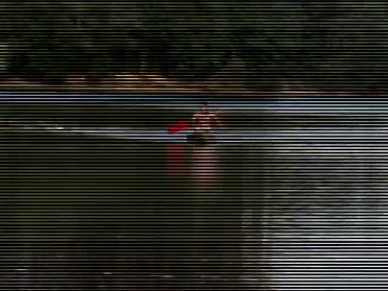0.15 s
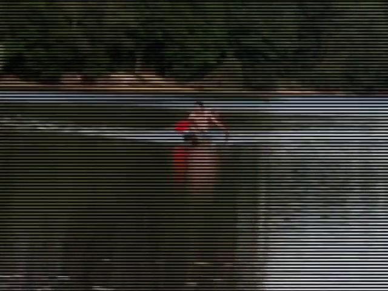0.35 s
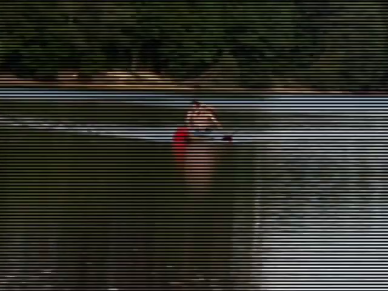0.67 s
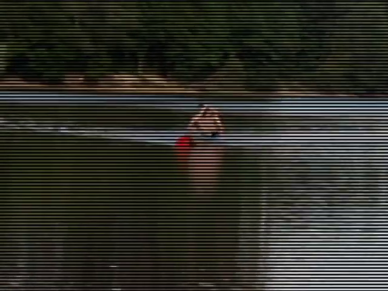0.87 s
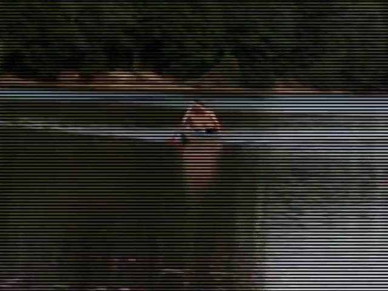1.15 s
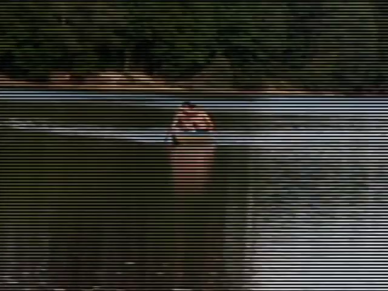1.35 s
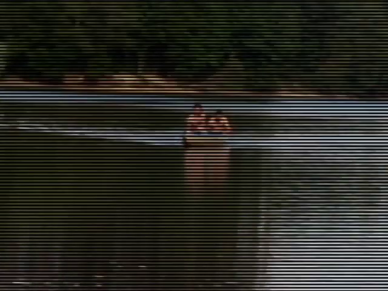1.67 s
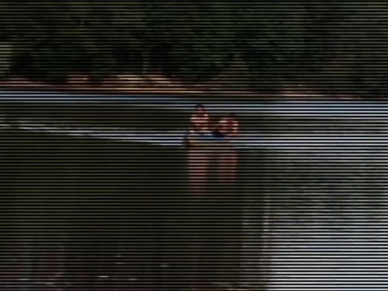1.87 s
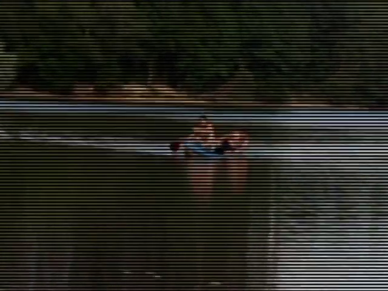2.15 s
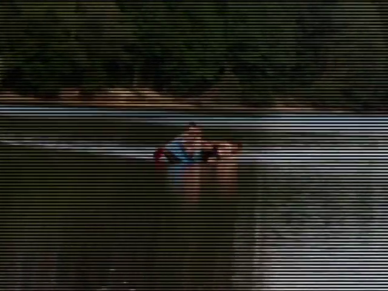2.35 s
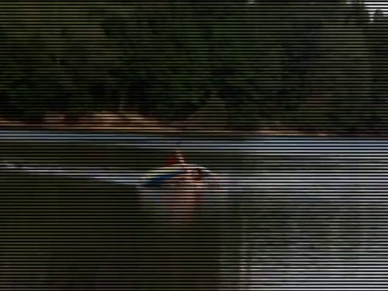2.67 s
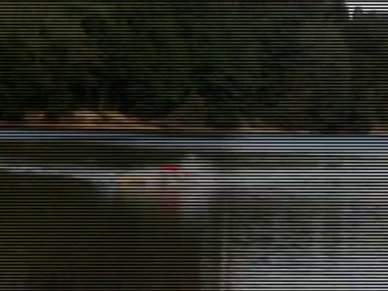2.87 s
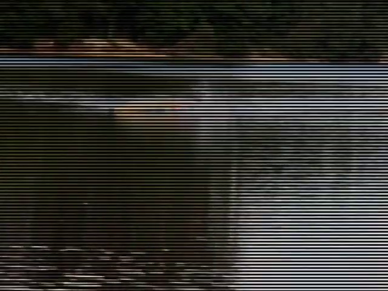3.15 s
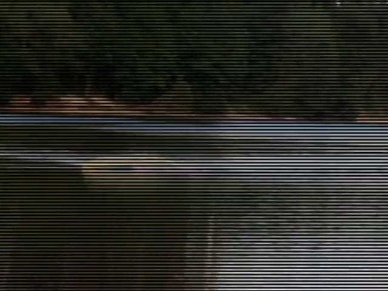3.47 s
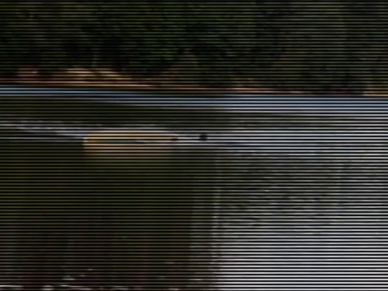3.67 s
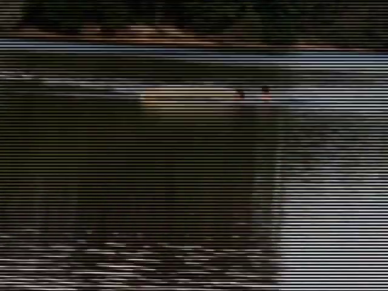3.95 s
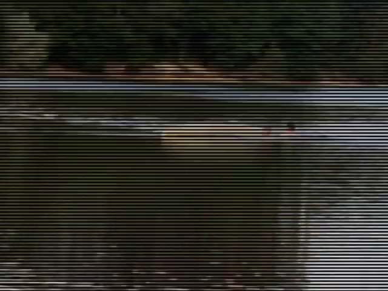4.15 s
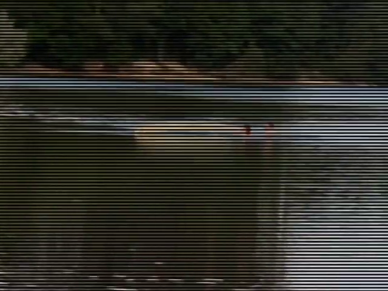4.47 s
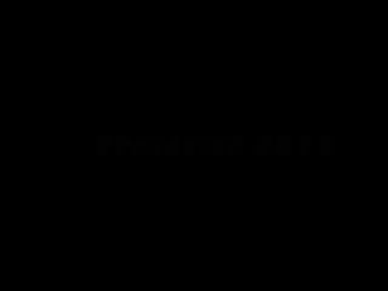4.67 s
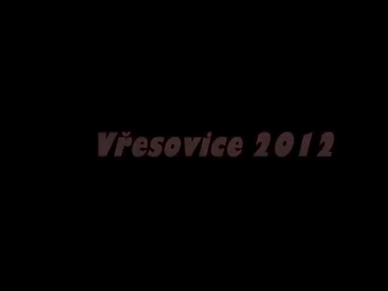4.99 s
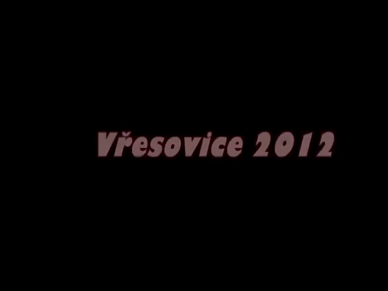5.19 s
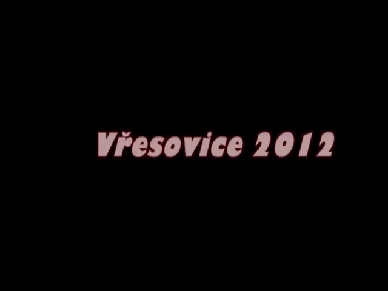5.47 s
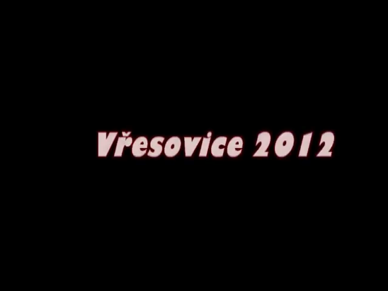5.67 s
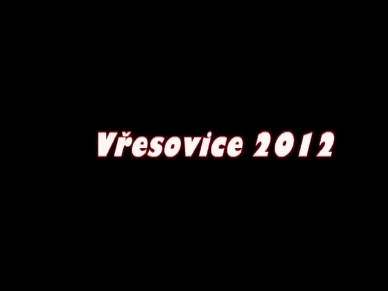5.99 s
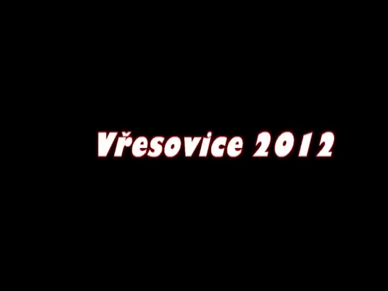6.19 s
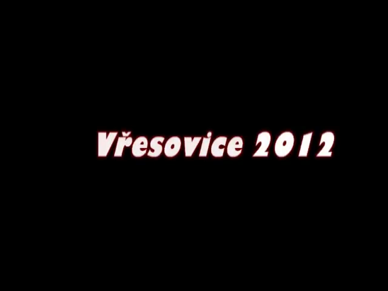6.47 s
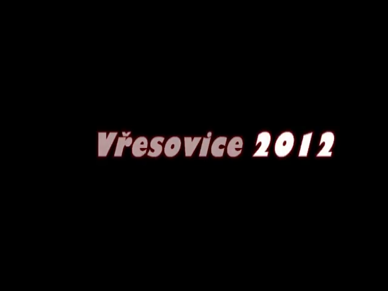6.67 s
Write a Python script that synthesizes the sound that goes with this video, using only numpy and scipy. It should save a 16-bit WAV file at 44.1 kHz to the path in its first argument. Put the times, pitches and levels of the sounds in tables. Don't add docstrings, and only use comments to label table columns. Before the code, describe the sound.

Irregular drops plop into still water, each a deep dull thump with a tiny tick and occasional bright bubble plinks, over faint hiss and low hum.

```python
import sys
import numpy as np
from scipy import signal
from scipy.fft import rfft, irfft, next_fast_len
from scipy.io import wavfile
from scipy.ndimage import uniform_filter1d, map_coordinates

SR = 44100
rng = np.random.default_rng(int(sys.argv[2]) if len(sys.argv) > 2 else 0)


def file_out(sig):
    cols = np.atleast_2d(sig).T
    lim = np.clip(cols, -1, 1)
    pcm = np.round(lim * 32767).astype(np.int16)
    wavfile.write(sys.argv[1], SR, pcm)


def undo_db(level):
    steps = np.asarray(level, float) / 20
    return 10 ** steps


N = 301203
LEAD = 512

# frequency in Hz, width in Hz, level in dB.
HULL_MODES = [
    (69.1, 14, -13),
    (138, 310, -22.5),
    (207, 56, -1.5),
    (208, 144.2, 3),
    (256.2, 105, 3),
    (483.7, 460, -46.5),
    (880.0, 2100, -30.5),
]
# start in seconds, blow in dB, contact sharpness in Hz, slap in dB, tick in dB.
LANDINGS = [(-.0025, -19.5, 590, -24.5, -45.5), (0.4272, -7.5, 150, -45, -46), (0.5664, -25, 830, -30, -42),
            (1.61, -3.5, 150, -49, -30), (2.5084, -3.5, 142, -23.5, -40), (3.2438, -9.5, 324, -22, -25),
            (3.7383, -9.5, 350, -19, -24), (3.9464, -4.5, 148, -26, -30), (4.479, -4, 142.6, -28.5, -35),
            (5.0528, -4, 147, -27, -26), (5.6999, -6.5, 160, -40, -28), (5.8613, -21.5, 790, -40.5, -29),
            (5.9622, -8, 256, -24.5, -27), (6.5627, -5, 164, -23.5, -23)]
# start in seconds, blow in dB, contact sharpness in Hz,
# slap in dB.
CRATER_CLAPS = [(0.0279, -22, 890, -53), (0.5951, -20, 170, -57), (1.6294, -13.5, 350, -52),
                (1.6416, -18.5, 570, -51), (2.541, -10.5, 230, -42), (2.554, -9.5, 290, -24),
                (3.2778, -21, 900, -45), (3.2879, -15, 620, -49), (3.77, -13, 240, -48),
                (3.7824, -14, 490, -27.5), (3.9763, -10, 244, -30), (3.9911, -12.5, 865, -21),
                (4.517, -13.5, 916, -25.5), (5.0881, -14.5, 900, -49), (5.7305, -20, 310, -54),
                (5.7418, -19.5, 700, -57), (5.9871, -20, 900, -43), (6.001, -15, 410, -46),
                (6.599, -12.5, 585, -24.5)]
# start in seconds, blow
# in dB, contact sharpness in Hz, slap in dB, tick in dB.
GLANCING_BLOWS = [(.0376, -20.5, 670, -52, -50), (.4393, -19, 160, -60, -59),
                  (1.6115, -45.5, 930, -20, -49), (1.7536, -27, 694, -32.5, -46),
                  (3.404, -15.8, 553, -44, -49), (3.4009, -45.5, 900, -28, -26),
                  (3.5678, -26.5, 150, -55, -57), (3.561, -49, 900, -33.5, -47),
                  (4.5346, -16.5, 880, -50, -50), (5.068, -47.5, 894, -31, -51),
                  (5.0993, -10.5, 270, -17, -51.5), (5.617, -35, 896, -40, -50), (5.95, -41, 900, -20, -50),
                  (6.5879, -14.5, 150, -52, -47), (6.6227, -13, 150, -49, -50),
                  (6.619, -47, 900, -25.5, -44.5)]
# start in seconds, blow in dB.
NUDGES = [(0.064, -27), (.155, -32), (.266, -36), (.345, -34.5), (1.7897, -25), (2.669, -26.5),
          (3.409, -19), (3.493, -22.5), (3.4991, -21), (3.898, -22), (4.6503, -28), (5.2314, -27),
          (6.1247, -24)]
DEEP_BOOST = (12.5, 11, -21.5, 14)
# frequency in Hz, width in Hz, level in dB.
TICK_MODES = [
    (1400, 500, -4.5),
    (2800, 250, 4),
    (4700, 280, 1),
    (6360, 310, -3.5),
]
# start in seconds, peak in dB, t60 in seconds, brightest Hz.
FILM_CRACKS = [(.001, -11.5, 0.017, 2500), (0.0377, -9.5, 0.004, 2260), (0.0426, -22.5, 0.0065, 3540),
               (0.054, -23.5, 0.0066, 4500), (0.5712, -23, .005, 2500), (0.7998, -33.5, 0.0095, 584),
               (1.757, -26.5, 0.0089, 4500), (1.766, -26, 0.022, 5510), (4.5309, -9, .006, 2150),
               (4.533, -20, 0.038, 2450), (3.4058, -28, .014, 5400), (4.715, -37, 0.0047, 1180),
               (5.1035, -12, .008, 2900), (5.104, -9, .017, 1600), (5.116, -33.5, 0.0052, 4000),
               (6.5913, -20, .012, 4470), (6.61, -26.5, 0.0089, 4980), (6.6153, -33, 0.0089, 5470),
               (6.619, -11.5, 0.03, 3400), (6.622, -18, 0.025, 4950), (6.622, -21, 0.046, 1390),
               (1.756, -31.5, 0.074, 1294), (6.713, -41.5, 0.01, 5000), (6.770, -34.5, 0.0057, 4300)]
# start in seconds, peak in dB, pitch in Hz.
SPRAY_DROPLETS = [(.0015, -13, 3660), (.0035, -10, 5270), (.007, -28, 3660), (.031, -27.5, 2430),
                  (0.0423, -20.5, 4550), (.054, -19.5, 3700), (.108, -32.5, 3400), (.129, -35.5, 2800),
                  (4.593, -32, 2620), (4.597, -27.5, 2760), (4.658, -33.5, 5000), (5.709, -36, 3900),
                  (6.748, -40, 2110)]
# start in seconds, start pitch in Hz, end pitch in Hz,
# life in seconds, peak in dB.
BURSTING_BUBBLES = [
    (.035, 2400, 2500, .0051, -30.5),
    (.055, 1313, 1580, 0.023, -28.5),
    (1.7564, 2935, 3060, 0.0035, -6),
    (1.7577, 3050, 3170, .0089, -11),
    (4.544, 1250, 3005, 0.063, -28.5),
    (4.605, 2340, 2980, 0.011, -29.5),
    (4.721, 4030, 4100, .0073, -37),
    (6.628, 1592, 2720, .043, -22.5),
    (6.638, 2830, 3870, .012, -27.5),
    (6.64, 3350, 4500, 0.0046, -26),
]
# start in seconds, start pitch in Hz, end pitch in Hz,
# life in seconds, peak in dB.
DRIVEN_BUBBLES = [
    (4.5306, 1485, 1420, .005, -12.5),
    (4.532, 4950, 4970, 0.0043, -16.5),
    (4.532, 5980, 6200, 0.0032, -22.5),
    (4.546, 1920, 2950, .009, -25.5),
    (5.166, 1580, 2980, .0062, -30.5),
    (6.619, 1820, 2160, .011, -7),
    (6.712, 2730, 3120, 0.0031, -33),
]
# start in seconds, start pitch in Hz, end pitch in Hz, t60 in seconds,
# peak in dB.
RINGING_BUBBLES = [
    (0.038, 1280, 1400, 0.033, -9.5),
    (1.7665, 2607, 2620, 0.028, -4.5),
    (3.409, 192, 195, 0.069, -22.5),
    (3.571, 189, 200, 0.14, -28.5),
    (4.535, 1358, 1320, 0.034, -3.5),
    (5.1043, 1080, 1240, 0.093, -7),
    (6.2145, 205, 200, 0.1, -9),
    (6.66, 1870, 1930, .24, -40),
]
# frequency in Hz, level in dB.
HISS_SPECTRUM = [(150, -40.5), (250, -25), (330, -20), (500, -15), (700, -15.5), (900, -17.5),
                 (1500, -16.5), (3300, -18.5), (5000, -23), (6300, -31), (7300, -29.5), (9500, -62.5)]
# frequency in Hz, level in dB.
LAPPING_SPECTRUM = [(35, -28), (50, -15), (75, 0.5), (105, -9.5), (140, -2.5), (190, -5.5), (240, -11),
                    (280, -16.5), (400, -18), (600, -41.5)]
# frequency in Hz, level in dB per Hz.
SLOSH_SPECTRUM = [(3, -14.5), (12, -3), (30, -0.5), (45, -27.5), (60, -56)]
# multiple of the hum's fundamental, level in dB over the hiss.
HUM_PARTIALS = [(1, 3), (3, -6), (5, -3), (7, -9), (9, -17), (11, -12), (13, -14), (15, -19)]
# middle in seconds, half length in seconds, pitch in Hz, level in dB.
DRONE_SWELLS = [
    (1.2, .4, 138, -52),
    (2.3, .3, 133, -56.5),
    (2.75, 0.11, 130, -45),
    (3.185, 0.074, 127.6, -38.5),
    (3.604, 0.22, 125.3, -42.5),
    (5.6, 0.15, 156, -47),
    (6.5, 0.095, 160.3, -38),
]
# middle in seconds, depth in dB.
LEVEL_DIPS = [
    (.149, -10),
    (0.1862, -35),
    (0.2872, -46),
    (0.54, -32),
    (4.6218, -13),
    (4.695, -12),
    (5.2314, -46),
    (5.383, -35),
    (6.8277, -22),
]
# frequency in Hz, level in dB.
TOP_END = [(6000, 0.5), (7000, -13), (7400, -20), (7800, -48.5), (16000, -60)]


def unit(x):
    return x / np.sqrt(np.mean(x ** 2) + 1e-20)


def along(points, hz):
    f, v = np.transpose(points)
    return np.interp(np.log(hz + 1), np.log(f + 1), v)


def filtered(x, response):
    m = next_fast_len(x.shape[-1] + 8192)
    spectrum = rfft(x, m) * response(np.fft.rfftfreq(m, 1 / SR))
    return irfft(spectrum, m)[..., :x.shape[-1]]


def resonance(f, hz, width_hz):
    return 1j * f * width_hz / (hz * hz - f * f + 1j * f * width_hz)


def modal_terms(f, modes):
    return [(-1) ** k * undo_db(db) * resonance(f, hz, width) for k, (hz, width, db) in enumerate(modes)]


def add(track, s, sound):
    part = track[LEAD + round(s * SR):][:len(sound)]
    part += sound[:len(part)]


def blows():
    claps = [row + (-39.5,) for row in CRATER_CLAPS]
    nudges = [(s, db, 170, -120, -120) for s, db in NUDGES]
    kinds = (LANDINGS, claps, GLANCING_BLOWS, nudges)
    return [row + (deep_db,) for kind, deep_db in zip(kinds, DEEP_BOOST) for row in kind]


def thumps():
    bending = 0.816
    slap_hz, slap_width_hz = 556, 0.74 * 556
    slap_lag_s, slap_lag_s_per_khz = .0066, -.0034
    track = np.zeros(N + LEAD)
    f = np.fft.rfftfreq(16384, 1 / SR)
    travel = np.exp(-1j * bending * np.sqrt(f))
    lowest, *higher = modal_terms(f, HULL_MODES)
    higher = sum(higher)
    slap_body = resonance(f, slap_hz, slap_width_hz) ** 2 / (1 + 1j * f / 1500)
    slap = irfft(np.exp(-.3j * np.sqrt(f)) * slap_body)[:1024]
    slap = slap / np.abs(slap).max()
    for s, db, sharp_hz, slap_db, _, deep_db in blows():
        push = undo_db(db + 50.0) / (1 + 1j * f / sharp_hz) ** 2
        add(track, s, irfft(travel * push * (undo_db(deep_db) * lowest + higher)))
        slap_s = s + slap_lag_s + slap_lag_s_per_khz * sharp_hz / 1000
        add(track, slap_s, -undo_db(slap_db) * slap)
    return track[LEAD:]


def burst(db, t60, colour):
    t = np.arange(2048) / SR
    envelope = undo_db(-60 * t / t60) * (1 - np.exp(-t / 0.00082))
    puff = filtered(rng.standard_normal(len(t)) * envelope, colour)
    return undo_db(db) * puff / np.abs(puff).max()


def ticks(track):
    lag_s, t60_s = .0038, 0.0027
    for s, *_, tick_db, _ in blows()[:-len(NUDGES)]:
        add(track, s + lag_s, burst(tick_db, t60_s, lambda f: sum(modal_terms(f, TICK_MODES))))


def cracks(track):
    for s, db, t60, hz in FILM_CRACKS:
        add(track, s, burst(db, t60, lambda f: resonance(f, hz, 1.2 * hz) ** 2))


def spray(track):
    shower_s, shower_db, fade_db_per_s, shower_hz = .22, -35, 75, 4000
    when, size, pitch = rng.uniform(-1, 1, size=(26, 3)).T
    start = shower_s * ((when + 1) / 2) ** 1.5
    level = shower_db - fade_db_per_s * start + 4 * size
    shower = list(zip(start, level, shower_hz * (1 + .38 * pitch)))
    for s, db, hz in SPRAY_DROPLETS + shower:
        add(track, s - .0005, burst(db, 0.0055, lambda f: resonance(f, hz, 0.26 * hz) ** 2))


def snaps():
    track = np.zeros(N + LEAD)
    ticks(track)
    cracks(track)
    spray(track)
    return track[LEAD:]


def quiver(t, db):
    return db * map_coordinates(rng.standard_normal(40), [t * 300])


def bubbles():
    track = np.zeros(N + LEAD)
    fading = [row + (3.6 * row[3],) for row in BURSTING_BUBBLES]
    driven = [row + (42 * row[3],) for row in DRIVEN_BUBBLES]
    ringing = [(s, a, b, .52 * t60, db, t60) for s, a, b, t60, db in RINGING_BUBBLES]
    for s, start_hz, end_hz, life, db, t60 in fading + driven + ringing:
        t = np.arange(round(life * SR)) / SR
        pinch = 0.51 * np.exp(-t * start_hz / 0.51)
        hz = start_hz * (1 + pinch) + (end_hz - start_hz) * (t / life) ** 2.2
        fade_in = 1 - np.exp(-t * start_hz / .6)
        fade_out = 1 - np.exp(-(life - t) * end_hz / 3)
        strength = undo_db(db - 60 * t / t60 + quiver(t, db=-db / 12))
        add(track, s, strength * fade_in * fade_out * np.sin(2 * np.pi * np.cumsum(hz) / SR))
    return track[LEAD:]


def echoes(x, t60, db):
    t = np.arange(SR // 3) / SR
    tail = rng.standard_normal(len(t)) * undo_db(-60 * t / t60) * (1 - np.exp(-t / 0.0011))
    return undo_db(db) * signal.fftconvolve(x, tail / np.linalg.norm(tail))[:N]


def noise(spectrum, patchy_db):
    z = signal.stft(rng.standard_normal(N), nperseg=512)[2]
    field = uniform_filter1d(rng.standard_normal(z.shape), size=5, axis=0)
    field = unit(uniform_filter1d(field, size=10, axis=1))
    patchy = signal.istft(z * undo_db(patchy_db * field), nperseg=512)[1][:N]
    curve = [(0.89, -120)] + spectrum + [(SR / 2, -120)]
    return unit(filtered(patchy, lambda f: undo_db(along(curve, f))))


def settling(power, seconds):
    keep = np.exp(-1 / (seconds * SR))
    return signal.lfilter([1 - keep], [1, -keep], power)


def gain_control(dull, bright):
    attack_s, release_s, bass_db = 0.068, 0.42, -9
    duck_db, knee_db, earlier_db = 6, -37.5, -22
    t = np.arange(N) / SR
    heard = bright ** 2 + (undo_db(bass_db) * dull) ** 2
    loud = settling(settling(heard, attack_s), release_s)
    loud = loud + undo_db(2 * earlier_db) * np.exp(-t / release_s)
    return (1 + loud / undo_db(2 * knee_db)) ** (-duck_db / 20)


def lapping(dull, gain):
    calm_db, stirred_db, settle_s = -45, -20.5, .1
    stirred = undo_db(2 * stirred_db) * settling(dull ** 2, settle_s)
    return np.sqrt((gain * undo_db(calm_db)) ** 2 + stirred) * noise(LAPPING_SPECTRUM, patchy_db=4.0)


def slosh(dull):
    calm_db, stirred_db, settle_s = -74, -16.5, 0.064
    stirred = undo_db(2 * stirred_db) * settling(dull ** 2, settle_s)
    return np.sqrt(undo_db(2 * calm_db) + stirred) * noise(SLOSH_SPECTRUM, patchy_db=-0.5)


def low_hum():
    t = np.arange(N) / SR
    drift = map_coordinates(rng.standard_normal(40), [t * 4])
    turn = 2 * np.pi * 79.56 * t + 0.044 * drift
    return sum(undo_db(db) * np.sin(k * turn + rng.uniform(0, 2 * np.pi)) for k, db in HUM_PARTIALS)


def background(dull, bright):
    gain = gain_control(dull, bright)
    air = undo_db(-48) * gain * (noise(HISS_SPECTRUM, patchy_db=0.86) + low_hum())
    return air + lapping(dull, gain) + slosh(dull)


def drone():
    t = np.arange(N) / SR
    waver = map_coordinates(rng.standard_normal(60), [t * 7])
    tones = np.zeros(N)
    for middle, half, hz, db in DRONE_SWELLS:
        swell = undo_db(db) * np.exp(-((t - middle) / half) ** 2)
        tones += swell * np.sin(2 * np.pi * hz * t + 0.75 * waver)
    return undo_db(4.3 * waver) * tones


def scene():
    dull = thumps()
    bright = snaps() + bubbles()
    softened = filtered(bright, lambda f: 1 / (1 + 1j * f / 3500))
    tails = echoes(softened, t60=0.21, db=-20.5) + echoes(dull, t60=.08, db=-11)
    return (dull + bright + tails + background(dull, bright) + drone())[None]


def band_limit(x):
    return signal.sosfilt(signal.butter(12, 7440, fs=SR, output="sos"), x)


def record(dry):
    t = np.arange(N) / SR
    dips_db = sum(db * np.exp(-((t - s) / .0016) ** 2) for s, db in LEVEL_DIPS)
    x = filtered(dry * undo_db(dips_db), lambda f: undo_db(along(TOP_END, f)))
    x = x - .012 * x ** 3 - .002
    x = x + undo_db(-96) * rng.standard_normal(N)
    return band_limit(x)


dry = scene()
out = record(dry)
file_out(out)
```